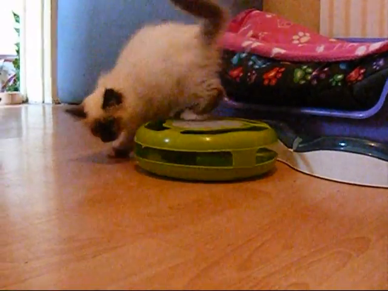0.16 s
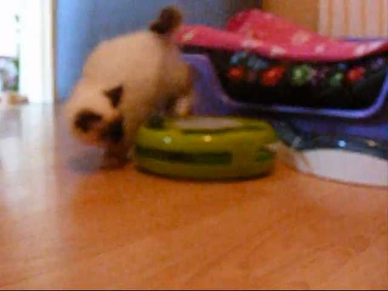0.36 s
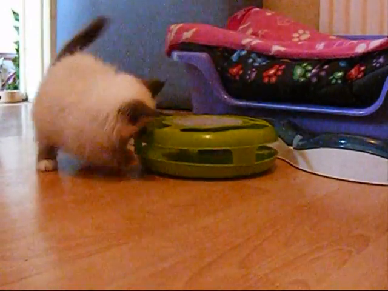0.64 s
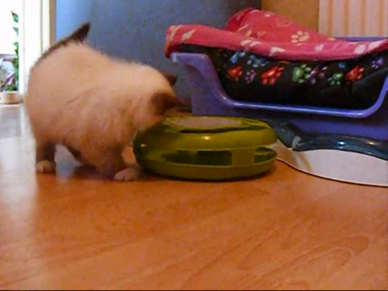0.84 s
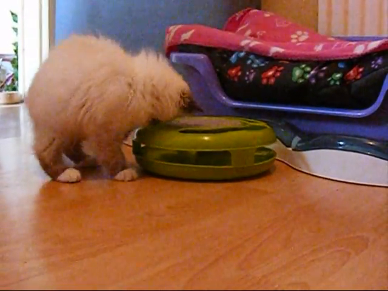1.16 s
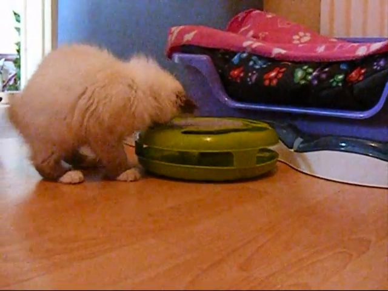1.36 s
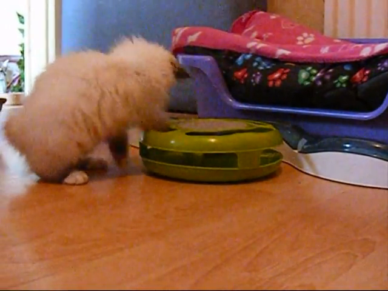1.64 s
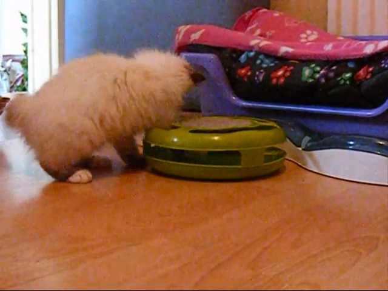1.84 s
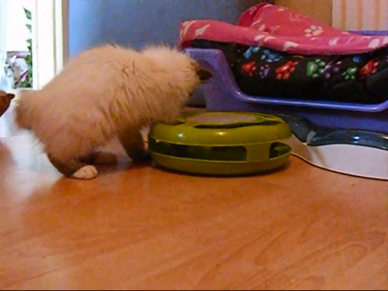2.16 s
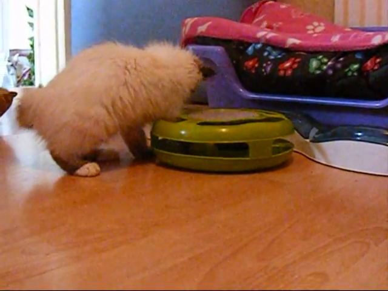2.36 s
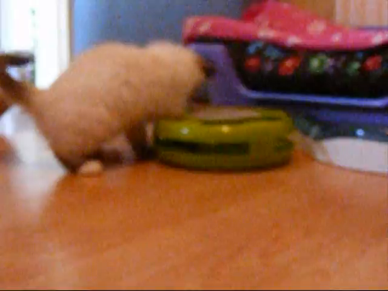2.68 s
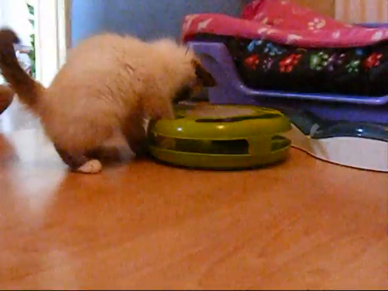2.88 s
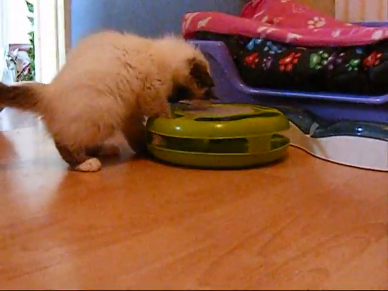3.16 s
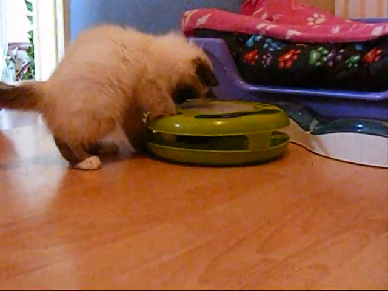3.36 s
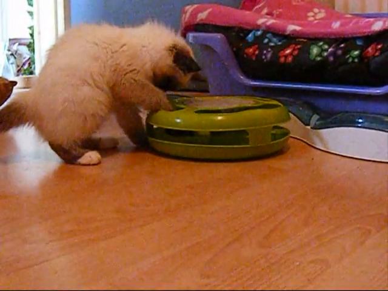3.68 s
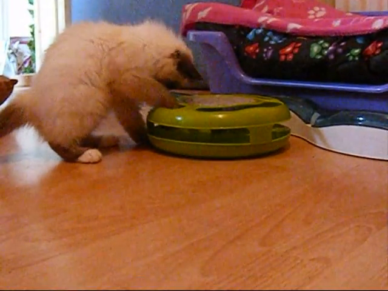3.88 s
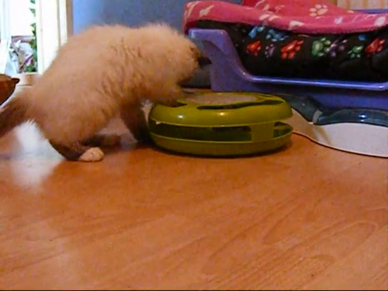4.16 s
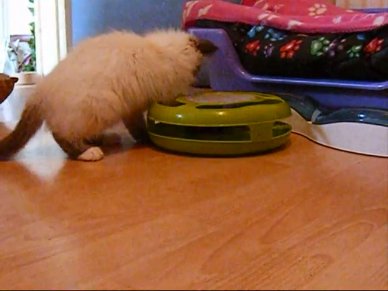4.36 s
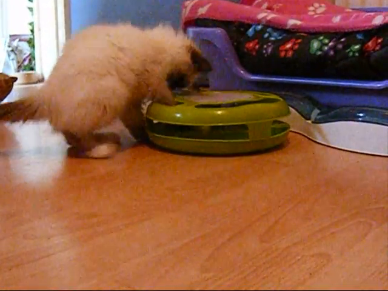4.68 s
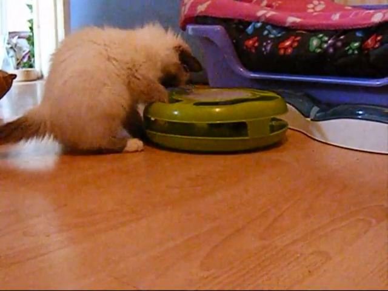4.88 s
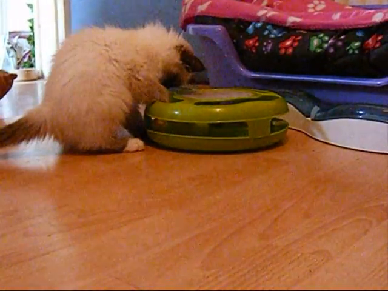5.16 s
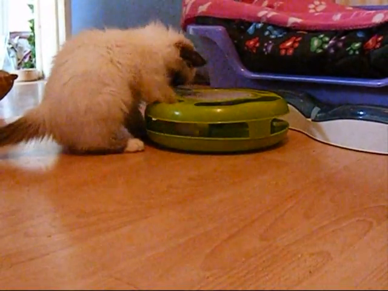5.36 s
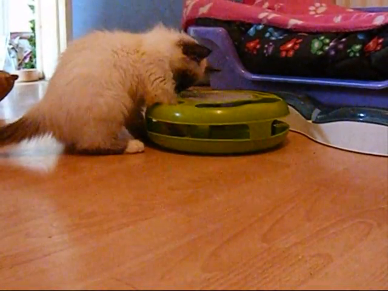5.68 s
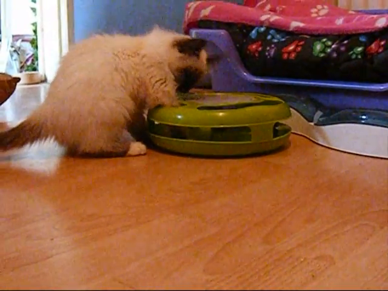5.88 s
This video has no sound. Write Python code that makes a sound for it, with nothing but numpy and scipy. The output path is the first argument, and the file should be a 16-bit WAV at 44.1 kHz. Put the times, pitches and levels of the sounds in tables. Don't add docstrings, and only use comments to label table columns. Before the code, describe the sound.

Close by in a small room, a kitten's paws and a ball hit a hollow plastic track toy. A hard, nearly overloaded clack comes early, followed by a short rolling rattle and lens-motor ticks. A quiet stretch holds one small cluster of knocks, then busy batting returns with brief scrapes, fades, and ends after a late sharp click. A small camera microphone gives a narrow, muffled sound with constant hiss.

```python
import sys
import numpy as np
from scipy import signal
from scipy.io import wavfile
from scipy.ndimage import uniform_filter1d

SR = 44100
rng = np.random.default_rng(int(sys.argv[2]) if len(sys.argv) > 2 else 0)


def transcribe(signal):
    frames = np.atleast_2d(signal).T
    limited = np.clip(frames, -1, 1)
    pcm = np.round(limited * 32767).astype(np.int16)
    wavfile.write(sys.argv[1], SR, pcm)


def undo_db(level):
    steps = np.asarray(level, float) / 20
    return 10 ** steps


N = 265482

# pitch in Hz, level in dB, t60 in seconds.
BRIGHT_MODES = [(1323, -6.5, 0.029), (1740, -2.5, 0.029), (2093, -6.5, 0.027), (2220, -8.5, 0.037),
                (2430, -8, 0.045), (2685, -4.5, 0.023), (3220, 0, 0.017), (3515, -13, 0.0088),
                (3400, -12.5, 0.038), (3574, -6, 0.026), (3977, -9.5, 0.017), (4410, -8.5, 0.02)]
SHELL_MODES = [(540, 4.5, 0.028), (617, -2.2, 0.05), (667, -6, 0.12), (796, 2, 0.04), (880, 2.5, 0.029)]
DRUM_MODES = [(145, -17.5, 0.15), (198, -7, 0.11), (290, -6, 0.26), (401, -7.5, 0.062)]
# start in seconds, bright peak in dB, shell modes in dB re bright,
# drum modes in dB re bright, favoured shell pitch in Hz.
PATS = [(.0692, -22.5, 3, -7.5, 505), (.2024, -6, -.7, -24, 842), (.2314, -14, -17, -34, 897),
        (.7594, -41.5, 13, -7, 515), (.9058, -43, 18, -22, 600), (1.8457, -18, -14.5, -11, 574),
        (1.8652, -19.5, 0.5, -22.5, 726), (1.9774, -40, 12, -22, 580), (1.9934, -22.5, -3, -10.5, 693),
        (3.0035, -25, 5, -12, 880), (3.0392, -13, -1.5, -19.5, 885), (3.1402, -31, 3, -2.5, 676),
        (3.4458, -31, 5.5, -0.5, 648), (3.5294, -24, -30, 8.5, 590), (3.5969, -28, 1.5, -19, 696),
        (3.8403, -33.5, -0.5, -26, 690), (4.1635, -13.5, -1.5, -27, 820), (4.1744, -10, 2.9, -28, 825),
        (4.1991, -19.5, 10, -11.5, 620), (4.6752, -21.5, -2.5, -10, 740), (4.7945, -11, -3.5, -7, 791),
        (4.8294, -13, -2.5, -14.5, 720), (4.9331, -16.5, -6.5, -39, 726), (5.6184, -41, -12, -23, 690)]


def evened(x):
    return x / np.sqrt(np.mean(x ** 2) + 1e-20)


def read(points, hz):
    f, value = np.transpose(points)
    return np.interp(np.log(hz + 1), np.log(f + 1), value)


def add(mix, s, sound):
    part = mix[round(s * SR):][:len(sound)]
    part += sound[:len(part)]


def lean_db(hz, centre_hz, per_octave_db):
    return -per_octave_db * abs(np.log2(hz / centre_hz))


def shell_pitch(s):
    return np.interp(s, [pat[0] for pat in PATS], [pat[4] for pat in PATS])


def motion():
    # start in seconds, level in dB,
    # fall in dB per second, favoured pitch in Hz, weight on the floor in dB.
    rolls = [(0.0, -27.5, 333, 1850, 0), (0.187, -17.5, 146.5, 2260, 1.5), (.186, -16, 403, 2444, 13),
             (.581, -27.5, 207.5, 2800, -1.5), (1.841, -38, 54, 1920, -1), (2.622, -29.5, 209, 1910, -11.5),
             (2.666, -26.5, 797, 2220, -7), (2.885, -38, 198, 1700, -4.5), (3.434, -54.5, 497, 2190, 15.5),
             (4.166, -16.5, 275, 1830, -3.5), (4.335, -46, 86, 1410, -0.5),
             (4.415, -20.5, 289, 2860, -12.5), (4.694, -26, 67.5, 2310, 1.5),
             (5.591, -20.5, 190, 3080, -6.5)]
    # peak in seconds, level in dB,
    # fall in dB per second, favoured pitch in Hz, weight on the floor in dB.
    slides = [(0.128, -36, 113, 1780, 1.5), (2.079, -51, 62, 1870, 5.5), (3.031, -22.5, 147.5, 1760, -1),
              (3.491, -24, 126, 2276, 1), (3.548, -38.5, 178, 2030, 14), (3.92, -45.5, 50, 2200, -1),
              (4.861, -35, 80, 2150, 2.5), (3.15, -43.5, 110.5, 1900, 8.5), (4.96, -32.5, 127, 2280, 1),
              (5.284, -49, 242, 2020, 4), (5.47, -46.5, 86, 2100, -0.5), (6.02, -44, 116, 1500, 4.5)]
    t = np.arange(0, N / SR, .001)
    s, db, fall, hz, weight = np.transpose(rolls + slides)[..., None]
    is_roll = np.arange(len(s))[:, None] < len(rolls)
    rise = np.where(is_roll, 5000.5, 3.13 * fall)
    drop_db = np.maximum(fall * (t - s), rise * (s - t))
    power = undo_db(2 * np.maximum(db - drop_db, -150))
    total = power.sum(0)
    rows = 10 * np.log10(total), (power * hz).sum(0) / total, (power * weight).sum(0) / total
    return [np.interp(np.arange(N) / SR, t, row) for row in rows]


def ring(modes, chance, centre_hz, per_octave_db, spread_db=5.0, detune=0.0082):
    hz, db, t60 = np.transpose(modes)[..., None]
    t = np.arange(6000) / SR
    level, pitch, phase = chance[:3 * len(modes)].reshape(3, -1, 1)
    db = db + lean_db(hz, centre_hz, per_octave_db) + spread_db * level - 60 * t / (0.77 * t60)
    build = 1 - np.exp(-t * hz / 0.29)
    x = (undo_db(db) * np.sin(2 * np.pi * (hz * (1 + detune * pitch) * t + phase)) * build).sum(0)
    return x / abs(x).max()


def knocks():
    # start in seconds, bright peak in dB,
    # shell modes in dB re bright, favoured bright pitch in Hz.
    clicks = [(.0044, -23.5, 3.5, 1810), (.1106, -19.5, -21, 2000), (.1825, -2, -5, 2270),
              (.2644, -16, -19, 2240), (.5836, -16.5, -33, 1320), (.5991, -11.5, -13.5, 1420),
              (1.258, -27.5, -17, 2010), (1.836, -24, -6, 2430), (1.8544, -12.5, -20, 1900),
              (1.8814, -20, -11, 1780), (2.9841, -22, -2.5, 1330), (3.02, -14, -32, 1640),
              (3.0713, -10, -32, 1780), (3.1024, -16.5, -12, 1680), (3.2192, -34.5, -11, 1900),
              (3.461, -25, -8, 1850), (3.4785, -11.5, -10, 2400), (3.5013, -6.5, -17, 2090),
              (3.549, -13.5, -8, 2150), (3.6362, -46, -17, 1730), (4.2382, -22.5, -5, 1470),
              (4.4109, -9.5, -24.5, 2790), (4.438, -32, -21, 3940), (4.6987, -13, -20, 2330),
              (4.7316, -14.5, -19, 2330), (4.805, -4.5, -6.5, 2220), (4.8708, -17.5, -28, 1740),
              (4.9536, -19, -12, 2180), (5.5854, -3.5, -38.5, 3130), (5.633, -14, -10.5, 2660)]
    out, t, pitch = np.zeros(N), np.arange(6000) / SR, motion()[1]
    blows = [(s, db, shell, drum, pitch[round(s * SR)], hz) for s, db, shell, drum, hz in PATS]
    blows += [(s, db, shell, shell - 12.5, hz, shell_pitch(s)) for s, db, shell, hz in clicks]
    for blow, chance in zip(blows, rng.standard_normal((len(blows), 6072))):
        s, db, shell_db, drum_db, hz, shell_hz = blow
        crack = 0.14 * signal.lfilter(*signal.iirpeak(hz, 1.3, SR), chance[72:]) * np.exp(-t / 0.0019)
        bright = ring(BRIGHT_MODES, chance, hz, 9.0)
        shell = undo_db(shell_db) * ring(SHELL_MODES, chance[36:], shell_hz, 24.0)
        drum = undo_db(drum_db) * ring(DRUM_MODES, chance[54:], 250, 2.8)
        contact_s = min(.0006 * undo_db(-0.44 * (db + 6)), .004)
        build = 1 - np.exp(-(t / contact_s) ** 2)
        add(out, s - contact_s / 2, undo_db(db) * build * (crack + bright + shell + drum))
    return out


def rolling(per_s=5000, size_db=3.97, damping=0.59):
    level_db, pitch, weight = motion()
    size = undo_db(size_db * np.minimum(rng.exponential(1, N), 4)) * (rng.random(N) < per_s / SR)
    # modes, level in dB, favoured pitch in Hz, lean in dB per octave
    families = ((BRIGHT_MODES, 0, pitch, 6.0),
                (SHELL_MODES, -0.5 + weight, shell_pitch(np.arange(N) / SR), 21.0),
                (DRUM_MODES, -10.5 + 0.69 * weight, 290, 7.0))
    out = np.zeros(N)
    for modes, rel_db, centre_hz, lean in families:
        gains = [undo_db(db + lean_db(hz, centre_hz, lean)) for hz, db, t60 in modes]
        whole = undo_db(rel_db) / np.sqrt(sum(g ** 2 for g in gains))
        for (hz, db, t60), gain in zip(modes, gains):
            resonance = signal.iirpeak(hz, hz * t60 * damping / 3.73, SR)
            mode = signal.lfilter(*resonance, size * rng.standard_normal(N))
            out += evened(mode) * gain * whole
    return out * undo_db(level_db - 4.5)


def scuffs():
    # start in seconds, length in seconds, pitch in Hz, width in Hz, level in dB.
    rubs = [
        (1.89, 0.053, 3600, 908, -41),
        (3.05, 0.12, 1760, 157, -34.5),
        (3.585, 0.028, 1740, 120, -34.5),
        (4.853, 0.18, 1730, 90, -42.5),
        (5.221, 0.13, 2000, 454, -43),
        (5.427, 0.1, 1980, 706, -51),
    ]
    out = np.zeros(N)
    for (s, length, hz, width, db), noise in zip(rubs, rng.standard_normal((len(rubs), 9000))):
        band = signal.iirpeak(hz, hz / width, SR)
        rub = evened(signal.lfilter(*band, signal.lfilter(*band, noise)))[-round(length * SR):]
        add(out, s, undo_db(db) * rub * signal.windows.tukey(len(rub), .7))
    return out


def room(x, edge_hz=5372):
    # frequency in Hz, t60 in seconds.
    decay = [(150, 0.41), (400, 0.095), (1000, 0.25), (2800, 0.16), (5000, 0.15)]
    taps = np.zeros((3, SR // 2))
    at = np.arange(160, SR // 2 - 20, 20) + rng.integers(0, 20, (3, (SR // 2 - 161) // 20))
    np.put_along_axis(taps, at, rng.choice([-1., 1.], at.shape), 1)
    hz, t, z = signal.stft(taps, SR, nperseg=256)
    tails = signal.istft(z * undo_db(-60 * t / read(decay, hz)[:, None]), SR, nperseg=256)[1]
    turn = np.pi * (7 * np.arange(N) / SR + np.arange(3)[:, None] / 3)
    wet = signal.fftconvolve(x * np.cos(turn) * np.sqrt(2 / 3), tails, axes=1)[:, :N].sum(0)
    low_share = np.sqrt(2 * edge_hz / SR)
    return wet / np.linalg.norm(tails[0]) / low_share * .5


def rattle(burst, peaks):
    poles = [(signal.iirpeak(hz, hz / width, SR), undo_db(db)) for hz, width, db in peaks]
    x = sum(g * signal.lfilter(*p, signal.lfilter(*p, burst)) for p, g in poles)
    return x / abs(x).max()


def steps():
    # start in seconds, tick in dB, gears in dB re tick,
    # hum in dB re tick.
    ticks = [(.089, -27.5, -5, -7.5), (.1556, -52, -5.5, -6), (.631, -20, -5, -5), (.715, -42.5, -14, -2.2),
             (.916, -40, -2, -9), (1.0294, -44.5, 7.5, -6), (1.116, -41.5, -1, 4.5), (1.2314, -44, 0, -9),
             (1.319, -40.5, 3.5, -10), (1.428, -54, -12, 4), (1.5154, -31, -5.5, -4.5),
             (2.835, -33, -2.5, -15), (2.8145, -25.5, -7.5, -3.5), (2.8653, -20.5, -8, -6),
             (3.3324, -45, 9.5, -5), (3.4044, -47, -13, 2), (3.925, -35, -0.3, -10.5),
             (6.0154, -38, -12, -12)]
    # start in seconds, length in seconds, first tick in dB, last tick in dB,
    # hum in dB re tick.
    moves = [(0.32, 0.012, -29.5, -25.5, -6), (.3494, .051, -27, -25.5, -10), (0.42, 0.011, -31, -27.5, -8),
             (0.5482, .0176, -25, -22.5, -7.5), (.816, 0.012, -30.5, -36.5, -4.5),
             (2.185, 0.025, -36.5, -42, -26), (2.25, 0.015, -29.5, -28.5, -4.5),
             (2.317, .0157, -34, -32.5, -15), (2.384, .0164, -30, -31, -0.5),
             (2.5138, 0.02, -29, -28.5, -2.5), (2.6193, 0.013, -26.5, -20, -12.5),
             (2.647, 0.019, -26.5, -20.5, -8.5), (2.7177, 0.014, -22.5, -27.5, -8.5),
             (2.7482, 0.019, -27.5, -22, -4.5), (2.781, .017, -24, -19.5, -15),
             (3.422, 0.0093, -33, -26.5, -11), (4.018, 0.014, -30.5, -28.5, -14.5),
             (4.1234, 0.043, -35, -30.5, -9.5), (4.318, .0137, -26.5, -29, -14),
             (4.53, 0.012, -26, -55.5, -12), (4.6236, .011, -22.5, -23.5, -11.5),
             (5.314, 0.036, -35, -47, -10), (5.9553, .011, -32, -30, -9.5)]
    rows = list(ticks)
    for start, length, first_db, last_db, hum_db in moves:
        for k, share in enumerate(np.linspace(0, 1, round(length * 60) + 1)):
            db = first_db + share * (last_db - first_db)
            gears_db = -6.5 - .25 * (db + 29.5) + 4 * (k % 2)
            rows.append((start + share * length, db, gears_db, hum_db))
    return rows


def focus_motor(hum_hz=871, hum_s=0.012, tail_s=0.075, tail_db=-16.5):
    # pitch in Hz, width in Hz, level in dB.
    barrel = [(1389, 330, 17.5), (1730, 250, 10.5)]
    # pitch in Hz, width in Hz, level in dB.
    gears = [(2150, 240, -0.5), (2850, 120, -0.5), (3360, 1200, -25.5), (3920, 600, -6.5)]
    out, t, rows = np.zeros(N), np.arange(6000) / SR, steps()
    held = np.clip(np.minimum(t / 0.00071, 1 + (hum_s - t) / 0.0077), 0, 1)
    tail = np.clip(np.minimum((t - hum_s - .007) / 0.0052, 1 + (tail_s - t) / 0.014), 0, 1)
    hum = held + undo_db(tail_db) * tail
    short_t = t[:1200]
    for (s, db, gears_db, hum_db), chance in zip(rows, rng.standard_normal((len(rows), 1201))):
        burst = chance[1:] * (short_t / .0015) * np.exp(1 - short_t / 0.0022)
        add(out, s - .001, undo_db(db) * (rattle(burst, barrel) + undo_db(gears_db) * rattle(burst, gears)))
        tone = np.sin(2 * np.pi * hum_hz * (1 + 0.012 * chance[0]) * t)
        add(out, s, undo_db(db + hum_db) * hum * tone)
    return out


def jolts(rise_s=.0002):
    # start in seconds, level in dB, fade in seconds, direction as a sign.
    thumps = [
        (.1829, -3, .0004, 1),
        (.1837, 2.6, .0005, -1),
        (4.4205, -18, .003, -1),
        (5.587, -24, .005, -1),
    ]
    out, t = np.zeros(N), np.arange(3000) / SR
    for s, db, fade, direction in thumps:
        add(out, s, direction * undo_db(db) * np.exp(-t / fade) * (1 - np.exp(-t / rise_s)))
    return out


def whine(hz=2660):
    # start in seconds, length in seconds, level in dB.
    leaks = [(.42, .06, -53), (.94, .045, -53), (1.428, .06, -51), (1.95, .05, -56), (2.438, .06, -51),
             (3.97, .07, -55), (4.47, .05, -56), (5.483, .078, -50)]
    out = np.zeros(N)
    for s, length, db in leaks:
        t = np.arange(0, length, 1 / SR)
        add(out, s, undo_db(db + 1.5) * np.sin(2 * np.pi * hz * t) * signal.windows.tukey(len(t), .35))
    return out * (1 + .35 * evened(uniform_filter1d(rng.standard_normal(N), 500)))


def hiss(level_db=-46.5, patchy_db=.4):
    # frequency in Hz, level in dB per Hz.
    spectrum = [(26, -45), (45, -10), (54, -10.5), (493, -13.5), (665, -14), (898, -17), (1010, -18),
                (1360, -16.5), (3420, -20.5), (5300, -25.5), (6890, -35), (11700, -120)]
    frames, hz = N // 256 + 5, np.fft.rfftfreq(1024, 1 / SR)
    real, imaginary, patches = rng.standard_normal((frames, 513, 3)).T
    patches = evened(uniform_filter1d(uniform_filter1d(patches, 12, 0), 14, 1))
    z = (real + 1j * imaginary) * undo_db(read(spectrum, hz)[:, None] + patchy_db * patches)
    return undo_db(level_db) * evened(signal.istft(z, nperseg=1024, noverlap=768)[1][:N])


def scene():
    toy = knocks() + rolling() + scuffs()
    microphone = signal.butter(3, [100, 4400], "bandpass", fs=SR, output="sos")
    heard = signal.sosfilt(microphone, toy + undo_db(-7.5) * room(toy))
    return (heard + focus_motor() + jolts() + whine() + hiss())[None]


def top_cut(x):
    return signal.sosfilt(signal.butter(12, 5450, fs=SR, output="sos"), x)


def record(dry):
    low_pass = signal.firwin(401, 5372, window=("kaiser", 9), fs=SR)
    narrow = signal.oaconvolve(dry, low_pass[None], "same")
    offset = -.0196
    return top_cut(np.clip(narrow + offset, -1, 1))


dry = scene()
out = record(dry)
transcribe(out)
```